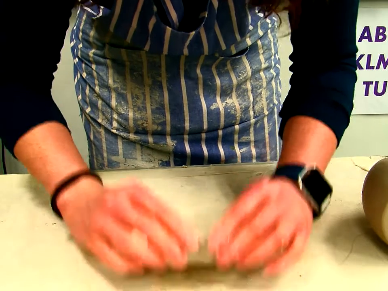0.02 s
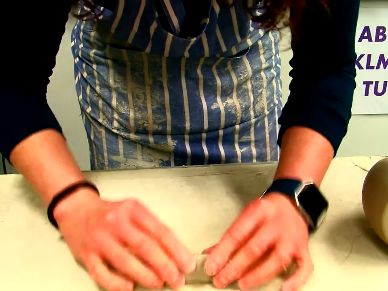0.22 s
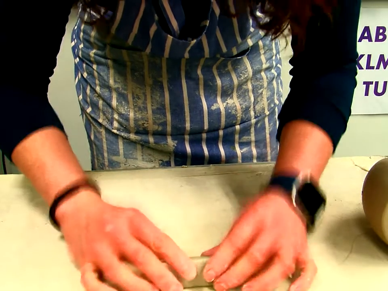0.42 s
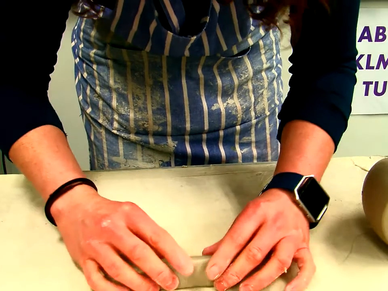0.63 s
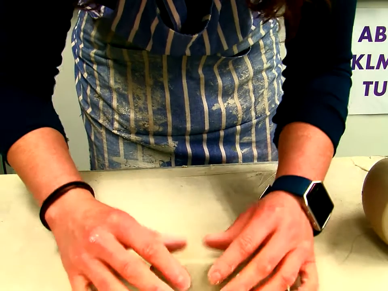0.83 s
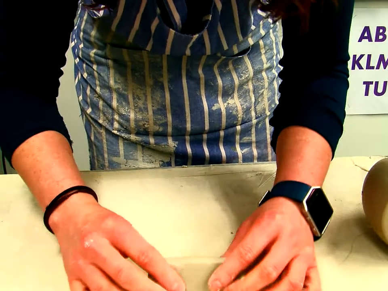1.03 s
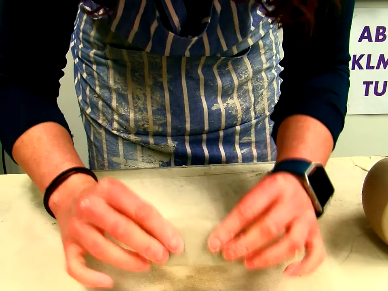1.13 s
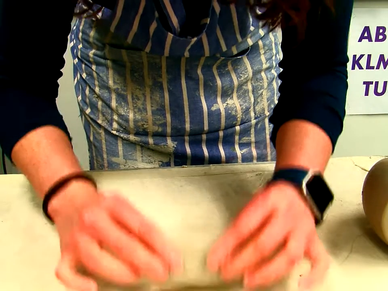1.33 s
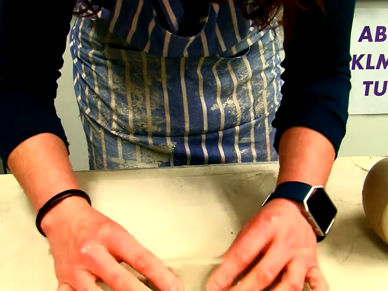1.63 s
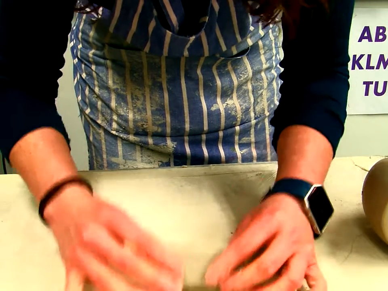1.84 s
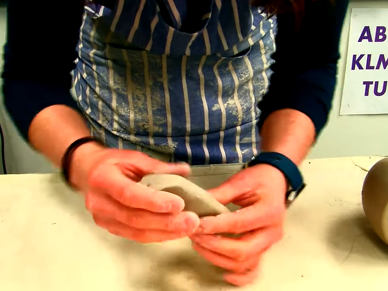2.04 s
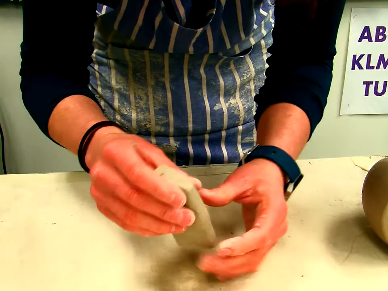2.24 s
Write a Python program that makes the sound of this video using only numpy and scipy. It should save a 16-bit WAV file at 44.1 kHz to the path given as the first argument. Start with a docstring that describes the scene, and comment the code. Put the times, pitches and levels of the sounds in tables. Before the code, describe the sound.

Two dull knocks of damp clay on wood, followed by soft pats in a humming room.

```python
"""Over a low hum, a slab of clay is knocked twice on a wooden work table, then hands pat it lightly.
The place is a small, quiet workshop, with the table near the microphone. Each contact thumps the
tabletop, makes the board clack and gives a brief smack of damp clay; the room rings after it.
The hum is ventilation, with a faint electrical whine. The hardest knock overloads the microphone."""
import sys
import numpy as np
from scipy import signal
from scipy.fft import rfft, irfft
from scipy.io import wavfile

SR = 44100
rng = np.random.default_rng(int(sys.argv[2]) if len(sys.argv) > 2 else 0)


def inscribe(sig):
    """Save sig as 16-bit PCM at rate SR to the path in sys.argv[1].

    A 1-D sig is mono; a 2-D sig holds one channel per row.
    Samples are clipped to [-1, 1] before scaling.
    """
    pcm = np.round(np.clip(np.atleast_2d(sig).T, -1, 1) * 32767)
    wavfile.write(sys.argv[1], SR, pcm.astype(np.int16))


N = 99225
T = np.arange(N) / SR


def clay_on_table():
    """Knocks and pats, as two signals: straight to the microphone, and out into the room."""
    # Each row: start in seconds, thump level in dB and cut-off in Hz, clack level in dB and cut-off
    # in Hz, pock level in dB, then the smack's level in dB, centre in Hz, resonance in dB, cut-off in Hz.
    contacts = [(0.2164, -15, 720, -13.5, 1200, -14, -10, 3000, -11, 3550),
                (0.292, -52, 404, -36, 1500, -38, -36.5, 3950, 8, 5500),
                (0.4541, -9.5, 1100, -1.5, 2520, 6, -1.5, 3300, 7, 2920),
                (0.507, -44, 620, -34, 2000, -44, -25.5, 5030, 1, 6000),
                (1.2796, -25, 237, -34, 3460, -24.5, -23.5, 3380, 5.5, 4300),
                (1.323, -38, 202, -42.5, 2554, -50, -32, 1800, 3, 2400),
                (1.367, -36, 203, -57, 3000, -62, -45, 5000, -11, 8000),
                (1.5027, -12, 96, -28.5, 3320, -21.5, -22, 6900, -7, 6900),
                (1.5190, -35, 430, -39, 1490, -54, -46, 1600, -5, 3000)]
    weight = 1 - np.exp(-T / 0.0012)  # the clay takes a moment to come down on the wood
    thump, board = weight * tabletop_thump(), board_clack()
    pocks = np.outer([1, from_db(-9.5)], clay_pock())  # direct, into the room
    out = np.zeros((2, N))
    for start_s, thump_db, thump_hz, clack_db, clack_hz, pock_db, smack_db, *smack_colour in contacts:
        thud = clay_thud(weight)
        clack = np.array([board + thud, from_db(-3) * board + from_db(12.5) * thud])
        hit = (from_db(thump_db) * cut(thump, thump_hz, "low")
               + from_db(clack_db) * cut(clack, clack_hz, "low")
               + from_db(pock_db) * pocks
               + from_db(smack_db) * clay_smack(*smack_colour))
        start = int(start_s * SR)
        out[:, start:] += hit[:, :N - start]
    return cut(out, 46.7, "high")  # the tabletop radiates little deep bass


def tabletop_thump():
    """The struck tabletop rings in its low bending modes."""
    # Each row: frequency in Hz, level in dB, time to fall 60 dB in seconds.
    bending_modes = [(63.5, -38, 0.084), (79.1, 1, 0.23), (166, 1.5, 0.25), (222, -2, 0.14),
                     (271, -8, 0.22), (349.2, 1.5, 0.24), (368, 5, 0.082), (474, 3, 0.072),
                     (574.5, -5, 0.18), (684, 2, 0.057)]
    return ring(bending_modes, neighbour_ratio=0.94)


def board_clack():
    """The board under the clay rings in short, hard modes, neighbours swinging opposite ways."""
    # Each row: frequency in Hz, level in dB, time to fall 60 dB in seconds.
    hard_modes = [(773, -12.5, 0.087), (962, -4, 0.066), (1048, -4, 0.062), (1252, 1, 0.014),
                  (1439, -11, 0.047), (1605, -4.5, 0.025), (1657, -2.5, 0.019), (2032, -7, 0.014),
                  (2325, -8, 0.023), (2645, -15, 0.046), (3210, -11.5, 0.024)]
    return ring(hard_modes, neighbour_ratio=-1.115)


def clay_thud(weight):
    """The dead, pitchless sound of the clay itself as its weight lands."""
    burst = even_noise(size=192) * weight * dying(t60=0.066)
    return from_db(-2) * cut(burst, [205, 2400], "band")


def clay_pock():
    """A short, round resonance that sinks in pitch as the clay flattens against the board."""
    start_hz, end_hz, sink_s, rise_s = 1293, 801, 0.00803, 0.0016
    hz = end_hz + (start_hz - end_hz) * np.exp(-T / sink_s)
    envelope = (1 - np.exp(-T / rise_s)) * dying(t60=0.041)
    return envelope * np.sin(2 * np.pi * np.cumsum(hz) / SR)


def clay_smack(centre_hz, resonance_db, cutoff_hz):
    """Damp clay meets a surface: a sharp tick and a few milliseconds of coloured noise."""
    spray = even_noise(size=48) * dying(t60=0.018)
    resonance = signal.lfilter(*signal.iirpeak(centre_hz, Q=5.5, fs=SR), spray)
    body = cut(spray + from_db(resonance_db) * resonance, cutoff_hz, "low", order=3)
    tick = from_db(-14) * even_noise(size=16) * dying(t60=0.0011)
    return cut(body + tick, 830, "high")


def hand_brushes():
    """Skin and clay brush the table in soft swells of friction noise."""
    # Each row: midpoint in seconds, length in seconds, level in dB, centre in Hz.
    brushes = [(0.29, 0.018, -50, 3980), (1.363, 0.032, -49.5, 5000), (1.547, 0.026, -55, 1490)]
    out = np.zeros(N)
    for middle_s, length_s, db, hz in brushes:
        swell = np.exp(-(2 * (T - middle_s) / length_s) ** 2)
        friction = rms_one(cut(rng.standard_normal(N), [hz / 2, hz * 2], "band"))
        out += from_db(db) * swell * friction
    return out


def workshop_reverb(x):
    """Near walls return dense early reflections, then a diffuse tail that dies band by band."""
    # Each row: frequency in Hz, reverberation gain in dB, time to fall 60 dB in seconds.
    room = [(70, -27, 0.33), (165, -8.5, 0.42), (254, -11, 1), (378, -22.5, 0.39), (504, 2, 0.38),
            (697, -10, 0.33), (970, -8, 0.57), (1420, -6.5, 0.17), (2200, -11, 0.61), (4360, -7.5, 0.28),
            (7460, -2.5, 0.31), (14700, -49, .1)]
    edges_hz = np.geomspace(45, 16000, 18)
    white = [even_noise(size=512), even_noise(size=512)]
    early = from_db(-7.5) * dying(t60=0.023)
    response = np.zeros(N)
    for k, (low, high) in enumerate(zip(edges_hz, edges_hz[1:])):
        hz = np.sqrt(low * high)
        envelope = early + dying(at_hz(room, hz, column=2))
        tail = cut(white[k % 2] * envelope, [low, high], "band")
        to_unit_gain = np.sqrt(2 * (high - low) / SR / np.sum(tail ** 2))
        response += from_db(at_hz(room, hz)) * tail * to_unit_gain
    delay = int(0.005 * SR)  # the walls answer 5 ms after the direct sound
    return signal.fftconvolve(x, np.pad(response, (delay, 0)))[:N]


def ventilation():
    """Moving air fills the room with steady rumble and hiss; resonances in it make the hum."""
    # The air's spectrum. Each row: frequency in Hz, relative density in dB.
    air_spectrum = [(12, -71), (20, -3.5), (38, 4.5), (70, -6.5), (133, -1), (175, -5), (213, -41),
                    (245, -8.5), (274, -11), (298, -11.5), (352, -24), (382, -28), (439, -25), (478, -24.5),
                    (519, -19.5), (565, -23.5), (788, -23.5), (857, -27.5), (2030, -35.5), (2270, -35),
                    (3640, -39), (8880, -43), (15500, -45.5)]
    # The hum's resonances. Each row: centre in Hz, half-width in Hz, rms level in dB.
    resonances = [(72.6, 32, -33), (86, 45, -52), (159, 12, -66.5), (213.4, 9.3, -45), (279.7, 20, -51.5),
                  (347, 18, -52), (354, 93, -53), (1034, 37, -66.5), (3300, 150, -79), (13200, 400, -71)]
    hz = np.arange(N // 2 + 1) * SR / N
    air = rfft(rng.standard_normal(N)) * from_db(at_hz(air_spectrum, hz))
    out = from_db(-32.5) * rms_one(irfft(air, N))
    white = rfft(rng.standard_normal(N))
    for centre_hz, width_hz, db in resonances:
        peak = white / (1 + ((hz - centre_hz) / width_hz) ** 2)
        out += from_db(db) * rms_one(irfft(peak, N))
    return out


def electrical_whine():
    """A thin, steady tone at the top of hearing, -62 dB rms."""
    return from_db(-62) * np.sqrt(2) * np.sin(2 * np.pi * 15734 * T)


def electrical_hiss():
    """Faint high bands of hiss behind everything: one wanders in pitch, two flutter in level."""
    # The wandering band's path. Each row: time in seconds, centre in Hz.
    path = [(0, 9840), (0.38, 10500), (0.56, 9850), (0.86, 9650), (0.99, 10540), (1.3, 10200), (1.63, 9950),
            (1.93, 10330), (2.25, 10000)]
    # The fluttering bands. Each row: centre in Hz, half-width in Hz, rms level in dB.
    bands = [(7160, 340, -64.5), (14000, 500, -64)]
    centre_hz = np.interp(T, *np.transpose(path))
    wander = from_db(-62.5) * narrow_noise(centre_hz, width_hz=320)
    flutter = 1 + 0.31 * np.sin(2 * np.pi * 12 * T)
    return wander + flutter * sum(from_db(db) * narrow_noise(hz, width) for hz, width, db in bands)


def ring(modes, neighbour_ratio):
    """Struck modes as dying sines; mode k is also scaled by neighbour_ratio ** k."""
    return sum(neighbour_ratio ** k * from_db(db) * dying(t60) * np.sin(2 * np.pi * hz * T)
               for k, (hz, db, t60) in enumerate(modes))


def even_noise(size):
    """Noise in which each block of `size` samples holds all frequencies equally."""
    phases = rng.uniform(0, 2 * np.pi, (N // size + 1, size // 2 + 1))
    return rms_one(irfft(np.exp(1j * phases), size).ravel()[:N])


def narrow_noise(hz, width_hz):
    """A narrow band of noise around a steady or moving centre; rms 1."""
    slow = cut(rng.standard_normal(N) + 1j * rng.standard_normal(N), width_hz, "low")
    carrier = np.exp(2j * np.pi * np.cumsum(hz * np.ones(N)) / SR)
    return rms_one(np.real(slow * carrier))


def dying(t60):
    """An envelope that falls 60 dB in t60 seconds."""
    return np.exp(-np.log(1000) * np.minimum(T / t60, 10))


def cut(x, hz, kind, order=2):
    """Butterworth filter."""
    return signal.sosfilt(signal.butter(order, hz, kind, fs=SR, output="sos"), x)


def at_hz(points, hz, column=1):
    """Read one column of a table along log frequency."""
    points = np.array(points)
    return np.interp(np.log(np.maximum(hz, 1)), np.log(points[:, 0]), points[:, column])


def from_db(db):
    """Decibels to gain."""
    return 10 ** (np.asarray(db) / 20)


def rms_one(x):
    """Scale to unit rms."""
    return x / np.sqrt(np.mean(x ** 2) + 1e-20)


def scene():
    """The table and the workshop around it, heard from one spot in mono."""
    room_tone = ventilation() + electrical_whine()
    direct, into_room = clay_on_table()
    return (direct + workshop_reverb(into_room) + hand_brushes() + room_tone + electrical_hiss())[None]


def record(dry):
    """The microphone overloads, flattening the highest peaks; the top treble is cut steeply."""
    ceiling, knee, cutoff_hz = 0.71, 12, 15900
    clipped = dry / (1 + np.abs(dry / ceiling) ** knee) ** (1 / knee)
    return signal.sosfilt(signal.ellip(12, .1, 80, cutoff_hz, fs=SR, output="sos"), clipped)


dry = scene()
out = record(dry)
inscribe(out)
```